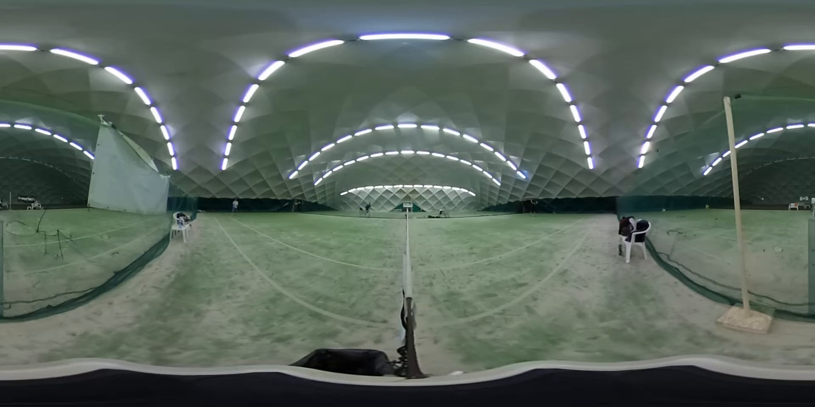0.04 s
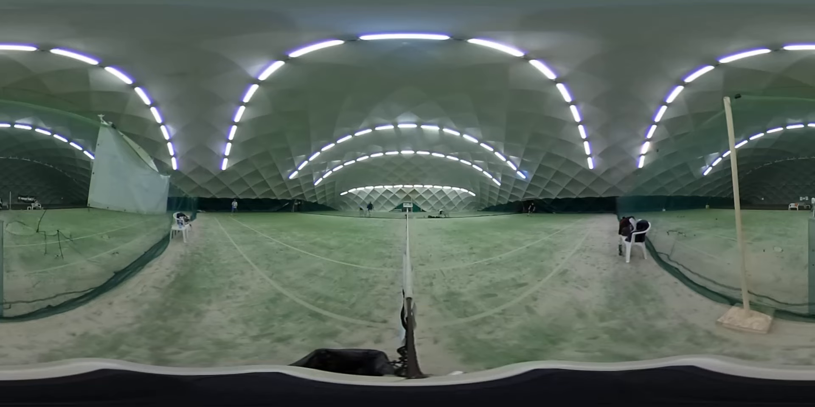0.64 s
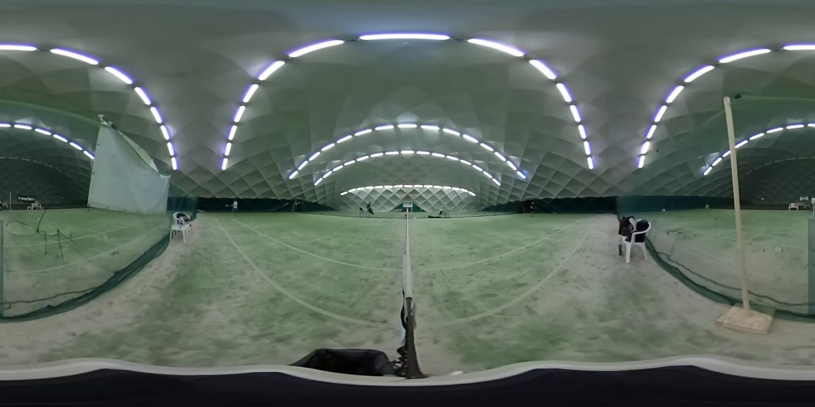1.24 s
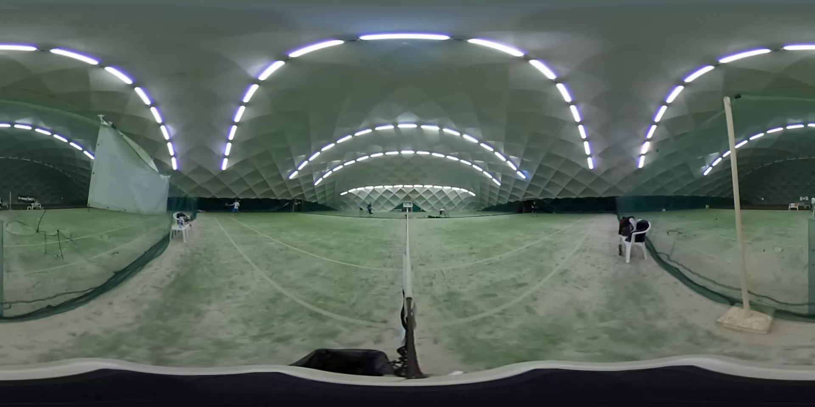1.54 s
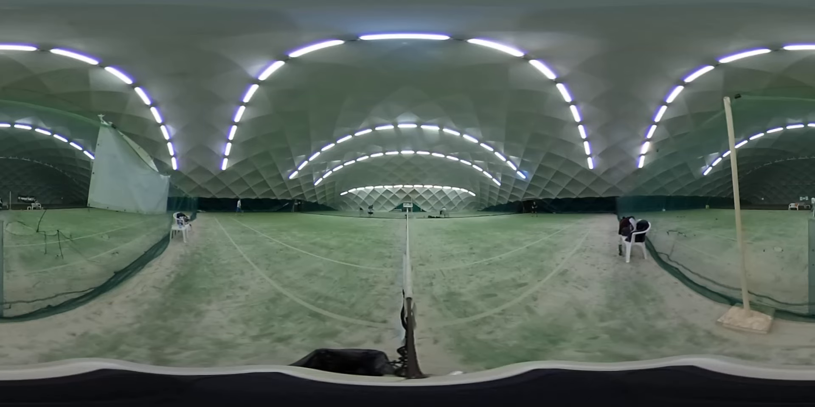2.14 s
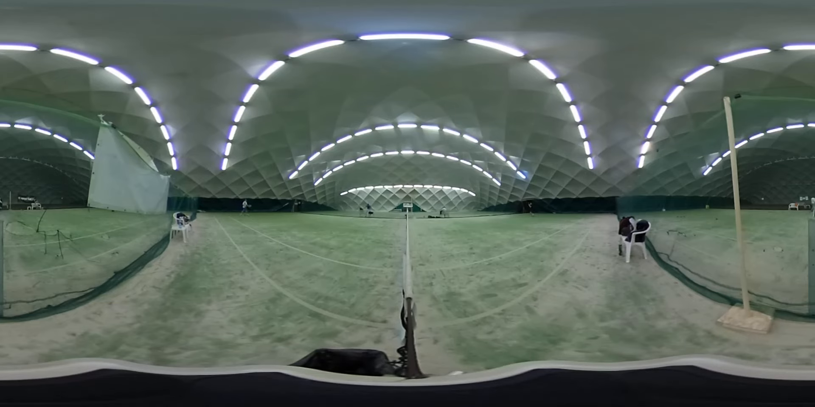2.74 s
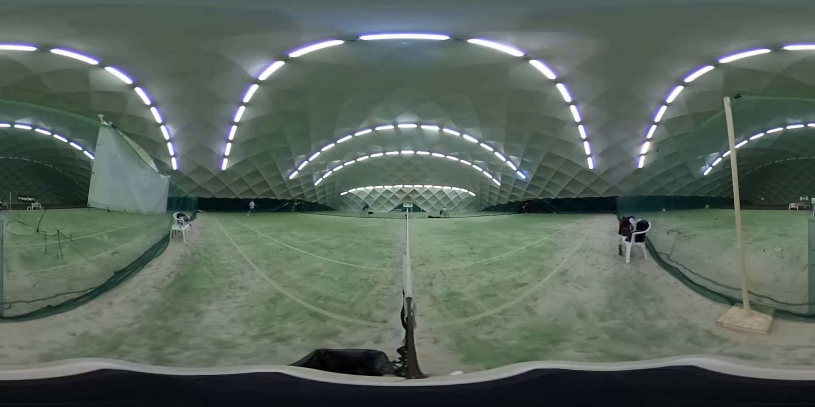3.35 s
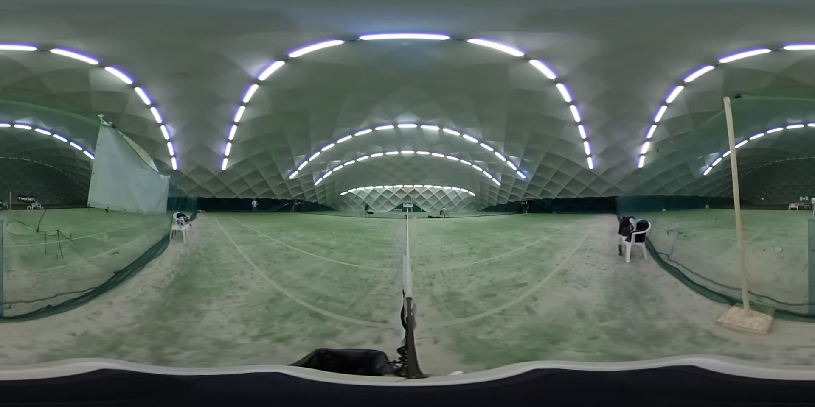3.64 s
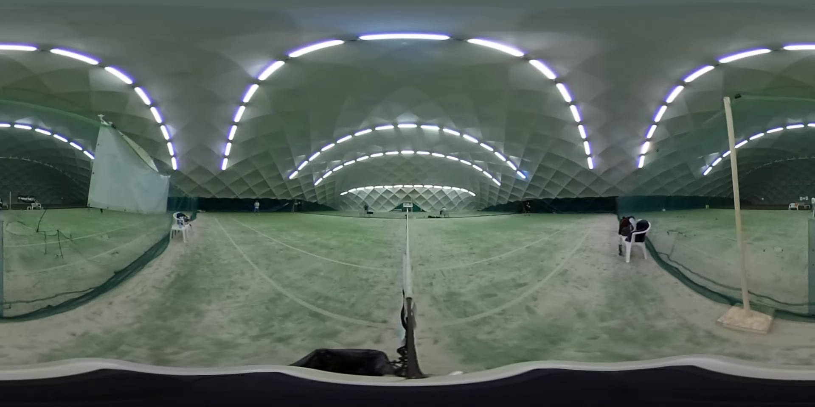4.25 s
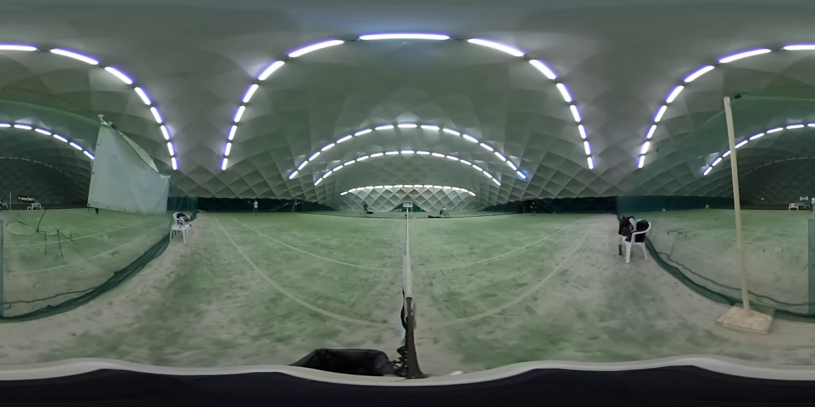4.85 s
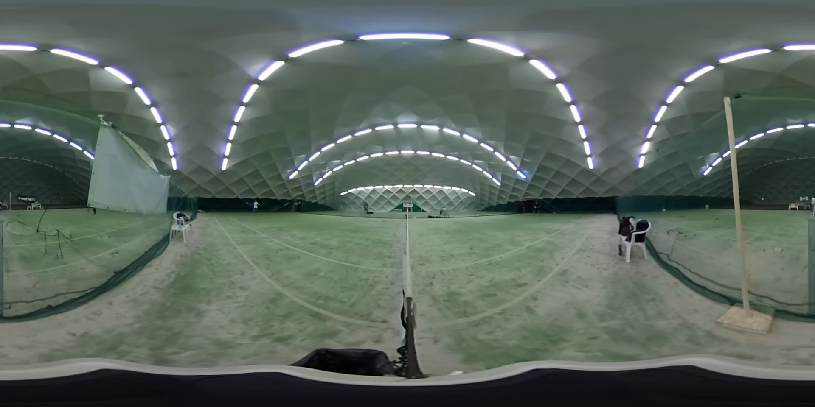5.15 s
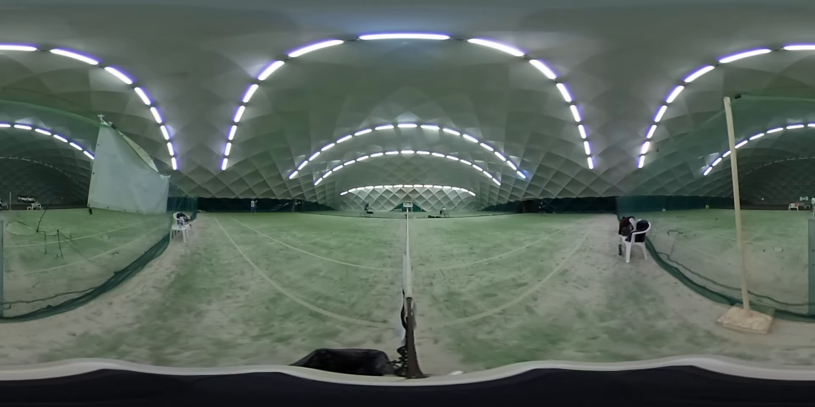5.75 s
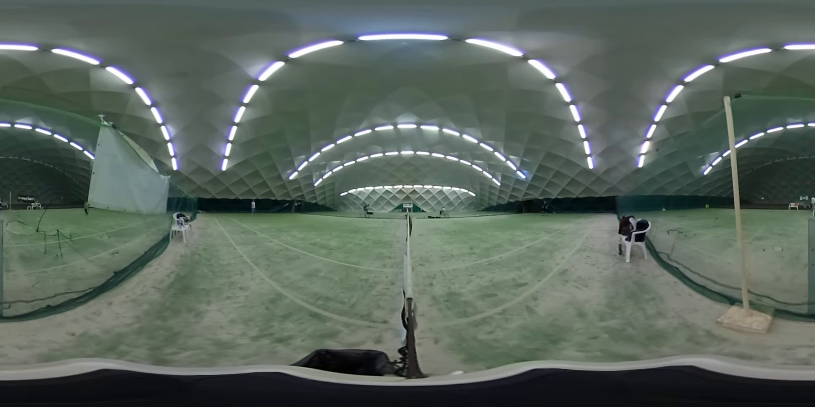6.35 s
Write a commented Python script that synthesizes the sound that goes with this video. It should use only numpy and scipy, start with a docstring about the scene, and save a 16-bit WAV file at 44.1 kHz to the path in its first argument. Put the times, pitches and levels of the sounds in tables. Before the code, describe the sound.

In a domed indoor tennis hall, ventilation hums steadily while rackets strike a ball four times, about two seconds apart, each hollow pop followed by a long echo. Dull distant bounces, faint steps and shoe squeaks come in between. At the end the ball hits the net right beside the microphone, rattling the band at the post and sending short falling chirps along the steel cable.

```python
"""Tennis in a domed indoor hall, the microphone at the net post. Ventilation hums and faint steps carry
over from the other courts. Four racket strokes follow, each thrown back by the roof and then, late and
long, by the far end; between them come distant bounces and shoe squeaks, and the dome lingers and booms.
Last, close by, the ball hits the net: the band rattles at the post and a kink runs to and fro along the
steel cable in falling chirps."""
import sys
import numpy as np
from scipy import signal
from scipy.fft import rfft, irfft, next_fast_len
from scipy.io import wavfile
from scipy.ndimage import uniform_filter1d, map_coordinates

SR = 44100
rng = np.random.default_rng(int(sys.argv[2]) if len(sys.argv) > 2 else 0)


def transcribe(signal):
    """Save signal, clipped to [-1, 1], as a 16-bit WAV file at the path in sys.argv[1]."""
    frames = np.atleast_2d(signal).T
    limited = np.clip(frames, -1, 1)
    pcm = np.round(limited * 32767).astype(np.int16)
    wavfile.write(sys.argv[1], SR, pcm)


N = 290619

# racket strokes: (t/s, level/dB, strings f/Hz, strings/dB, crack/dB, frame/dB, first roof delay/s,
# second roof delay/s, first echo's share of the roof energy, end wall delay/s, end wall/dB)
STROKES = [(0.459, -27, 620, -2.5, -12, -24.5, .0132, .0275, 0.26, .111, -11),
           (1.8156, -27.5, 983, -6, -14.5, -33, 0.018, 0.025, 0.26, 0.12, -7.5),
           (3.6847, -29, 875, 0.5, -12.5, -15.5, .0142, .0225, 0.8, .107, -3),
           (5.6166, -27.5, 1050, -6.5, -16.5, -42, .0178, .023, 0.18, 0.13, -2.5)]
# the net rattling at its post: (t/s, relative level/dB, decay/s, low knock/dB, rasp/dB)
RATTLES = [(6.192, -29, 0.01, 2.5, -35), (6.1975, -27.5, .0047, 5, -14), (6.205, -32, 0.021, 5, -42),
           (6.217, -24.5, .0057, -5, -38), (6.2402, -14, 0.007, -34, -17.5), (6.244, -12, 0.0097, -20, -23),
           (6.2565, -10.5, 0.0047, -15, -31), (6.263, -32, .021, 3, -22), (6.295, -36, 0.014, 0, -16.5),
           (6.3425, -33.5, .003, 5, -20), (6.415, -37.5, 0.007, -12, -17), (6.42, -35.5, .0054, -3, -23),
           (6.4309, -31.5, .0056, 2, -45), (6.4447, -20, 0.0029, -11, -21.5),
           (6.451, -33.5, 0.0068, -1.5, -45)]


def amp(db):
    """Decibels to gain."""
    return 10 ** (np.asarray(db) / 20)


def unit(x):
    """x at rms 1."""
    return x / np.sqrt(np.mean(x ** 2) + 1e-20)


def along(points, hz):
    """(f/Hz, value) points read on a log frequency axis."""
    f, v = np.transpose(points)
    return np.interp(np.log(hz + 1), np.log(f + 1), v)


def filtered(x, response):
    """x shaped by a gain that depends on frequency."""
    size = next_fast_len(len(x) + 8192)
    return irfft(rfft(x, size) * response(np.fft.rfftfreq(size, 1 / SR)), size)[:len(x)]


def noise(spectrum, size):
    """Noise of rms 1 with a spectrum of (f/Hz, level/dB) points."""
    return unit(filtered(rng.standard_normal(size), lambda hz: amp(along(spectrum, hz))))


def ringing(modes, size):
    """Noise of rms 1 ringing in steep-sided resonances: (f/Hz, width/Hz, level/dB)."""
    def gain(f):
        return sum(amp(db) * (f * width) ** 2 / ((hz * hz - f * f) ** 2 + (f * width) ** 2)
                   for hz, width, db in modes)
    return unit(filtered(rng.standard_normal(size), gain))


def even(x, size=220):
    """Noise held at rms 1 over every few milliseconds, so that a blow has a definite strength."""
    return x / np.sqrt(np.abs(uniform_filter1d(x ** 2, size)) + 1e-9)


def swell(t, peak):
    """A bump that rises to 1 at time peak and dies away."""
    u = np.maximum(t, 0) / peak
    return u * np.exp(1 - u)


def add(track, s, sound):
    """Mix a sound into the track from time s."""
    part = track[max(round(s * SR), 0):][:len(sound)]
    part += sound[:len(part)]


def ventilation():
    """The room tone: steady moving air with two rough fan tones."""
    air = [(12, -59), (20, -11.5), (65, 1), (102, -4), (141, -4), (175, -6.5), (268, -9.5), (299, -7.5),
           (401, -17), (471, -16), (996, -21.5), (1140, -21), (2160, -29.5), (3320, -38), (12000, -41),
           (15600, -62), (22000, -120)]  # spectrum of the airflow: (f/Hz, level/dB)
    fan_tones = [(73, 42, -64), (133.3, 19, -58.5)]  # hum of the fans: (f/Hz, width/Hz, level/dB)
    fans = sum(amp(db) * ringing([(hz, width, 0)], N) for hz, width, db in fan_tones)
    return amp(-52.5) * noise(air, N) + fans


def footwork(count=70, step_db=-64):
    """Faint scrapes and steps from the other courts, at random moments and blurred by the hall."""
    sole = [(200, -5), (600, 3.5), (2300, 3), (3300, -9), (12000, -23)]  # (f/Hz, level/dB)
    out, t = np.zeros(N), np.arange(SR // 10) / SR
    for when, softness, drag in rng.random((count, 3)):
        scrape = swell(t, 0.0011 + 0.012 * drag) * noise(sole, len(t))
        add(out, when * N / SR, amp(step_db - 3.8 * softness) * scrape)
    return out + amp(-7) * hall(out)[:N]


def hall(x, delay=0.108, wall_db=-12, clump_s=0.011, scatter_db=-9):
    """The dome's echo: weak scatter, then the far end answers in a clump and the hall rings on."""
    t60 = [(150, 0.79), (450, 3.03), (700, 3.63), (1000, 1.94), (2500, 1.4), (6000, 1.6), (12000, .5)]  # reverberation time: (f/Hz, T60/s)
    colour = [(100, -15), (280, -3), (450, 2), (700, -3.5), (950, 1), (1200, -1.5), (1600, -2.5),
              (2400, -0.5), (3600, -9.5), (8000, -1.5), (12000, -12)]  # tone of the hall's echo: (f/Hz, level/dB)
    hz, times, bands = signal.stft(rng.standard_normal(2 * SR), SR, nperseg=256)
    decay = amp(-60 * times / along(t60, hz)[:, None])
    tail = signal.istft(bands * decay, SR, nperseg=256)[1]
    t = np.arange(len(tail)) / SR
    scatter = amp(scatter_db) * np.minimum(t / 0.039, 1)
    clump = 1 + np.exp(-np.abs(t - delay) / clump_s)
    response = amp(-33.5) * tail * np.where(t < delay, scatter, clump)
    add(response, delay, amp([wall_db]))  # the end wall's own sharp echo
    return signal.fftconvolve(x, filtered(response, lambda f: amp(along(colour, f))))


def racket(string_hz, string_db, crack_db, frame_db, thump_hz=275.4, frame_hz=3404, dwell_s=0.00382):
    """The ball squashes with a thump, pop and crack; the frame clicks; the strings ping as it leaves."""
    pop_spectrum = [(200, -19), (480, 15.5), (720, 8), (1000, 7.5), (1350, -6), (1700, -14), (3000, -45),
                    (6000, -60)]  # the ball's hollow pop: (f/Hz, level/dB)
    crack_spectrum = [(400, -1.5), (1200, 16), (1750, 3.5), (2350, 5), (3100, -6.5), (4400, -6),
                      (6300, -12), (8500, -9.5), (12000, -9.5)]  # the crack of contact: (f/Hz, level/dB)
    t = np.arange(SR // 10) / SR
    t_squash, t_free = t - 0.00059, t - dwell_s
    thump = swell(t_squash, 0.002) ** 2 * np.sin(2 * np.pi * thump_hz * t_squash)
    ping = amp(string_db) * swell(t_free, 0.00086) * np.sin(2 * np.pi * string_hz * t_free)
    pop = amp(-11.5) * swell(t_squash, 0.0029) * even(noise(pop_spectrum, len(t)))
    crack_envelope = (1 - np.exp(-t / 0.00051)) * np.exp(-t / 0.0076)
    crack = amp(crack_db) * crack_envelope * even(noise(crack_spectrum, len(t)))
    frame = amp(frame_db) * swell(t, 0.00082) * np.sin(2 * np.pi * frame_hz * t)
    return thump + ping + pop + crack + frame


def roof(x, scatter_s=0.018, scatter_db=-31):
    """A patch of the curved roof throws back one distinct copy with a trail of scatter."""
    colour = [(150, 1), (500, 5), (3000, 6), (7000, 9), (12000, -10)]  # (f/Hz, level/dB)
    t = np.arange(SR // 5) / SR
    response = amp(scatter_db) * np.exp(-t / scatter_s) * noise(colour, len(t))
    response[0] += 1
    return signal.fftconvolve(x, response)


def rally(roof_db=0.5, hall_db=-1.85, roof_to_hall_db=-7):
    """Each stroke reaches the microphone directly, twice off the roof and late from the far end."""
    out = np.zeros(N)
    for s, db, *timbre, first_delay, second_delay, share, wall_delay, wall_db in STROKES:
        blow = lambda: amp(db) * racket(*timbre)  # slightly different in every direction
        add(out, s, blow())
        add(out, s, amp(hall_db) * hall(blow(), wall_delay, wall_db))
        for delay, energy in [(first_delay, share), (second_delay, 1 - share)]:
            add(out, s + delay, amp(roof_db) * np.sqrt(energy) * roof(blow()))
            add(out, s + delay, amp(roof_to_hall_db) * hall(blow(), wall_delay))
    return out


def dome_wash(rally_db=-61, build_s=1, waver_db=1.5, waver_points=14, net_db=-53):
    """The dome's lingering wash builds after the first stroke, wavers and swells when the net is hit."""
    colour = [(100, -8), (280, -6.5), (500, 2.5), (1100, -1.5), (1600, -14), (2300, -15.5), (3500, -28.5),
              (9000, -70)]  # spectrum of the wash: (f/Hz, level/dB)
    t = np.arange(N) / SR
    build = 1 - np.exp(-np.maximum(t - STROKES[0][0], 0) / build_s)
    waver = map_coordinates(rng.standard_normal(waver_points), [np.linspace(0, waver_points - 1, N)])
    from_rally = amp(rally_db + waver_db * waver) * np.sqrt(build)
    from_net = amp(net_db) * swell(t - RATTLES[0][0], 0.27)
    return np.hypot(from_rally, from_net) * noise(colour, N)


def far_courts(grit_db=-12, scuff_db=-61, hall_db=-4):
    """Dull bounces, shoe squeaks and scuffs, far from the microphone and half lost in the hall."""
    bounces = [(1.196, -34.5, 282), (1.2288, -40.5, 387), (1.2761, -46.5, 660), (1.391, -47, 353),
               (2.418, -50, 242.2), (3.2356, -43.5, 250), (3.271, -40.5, 295), (4.818, -38.5, 294),
               (4.851, -43.5, 322)]  # balls and footfalls: (t/s, level/dB, f/Hz)
    grit = [(200, -38), (600, 5), (1500, 5), (2500, -55), (4000, -31), (12000, -25)]  # sand under each bounce: (f/Hz, level/dB)
    squeaks = [(1.309, -49.5, 2240, 0.0028), (1.33, -64, 2370, 0.0052), (1.381, -64, 2440, 0.0083),
               (1.438, -59, 1960, 0.0038), (4.667, -60.5, 1910, 0.023)]  # shoe squeaks: (t/s, level/dB, f/Hz, rise/s)
    scuffs = [2.106, 2.338, 2.42, 2.537, 2.626, 2.74, 2.973]  # shoes scuffing the sanded court: (t/s)
    sand = [(400, 8), (1500, 16), (2500, 13), (4000, -1), (8000, 0.5), (12000, 0)]  # sand under a scuffing shoe: (f/Hz, level/dB)
    out, t = np.zeros(N), np.arange(SR // 10) / SR
    for s, db, hz in bounces:
        thud = np.sin(2 * np.pi * hz * t) + amp(grit_db) * noise(grit, len(t))
        add(out, s, amp(db) * swell(t, 0.0016) * thud)
    for s, db, hz, rise in squeaks:
        bands = [(hz * 0.86, hz * 0.24, 0), (hz * 1.08, hz * 0.17, -1)]  # either side of the pitch
        add(out, s, amp(db) * swell(t, rise) * even(ringing(bands, len(t))))
    for s in scuffs:
        add(out, s, amp(scuff_db) * swell(t, 0.0054) * noise(sand, len(t)))
    return out + amp(hall_db) * hall(out)[:N]


def dome_booms():
    """Narrow bands of the dome's reverberation that swell and linger."""
    notes = [(1.95, -55, 237, 25, 0.19), (2.0, -56.5, 455, 49.7, 0.23), (5.281, -56.5, 275, 40.7, 0.16),
             (5.73, -52.5, 740, 202, 0.11)]  # notes of the dome: (t/s, level/dB, f/Hz, width/Hz, rise/s)
    out, t = np.zeros(N), np.arange(2 * SR) / SR
    for s, db, hz, width, rise in notes:
        add(out, s, amp(db) * swell(t, rise) * ringing([(hz, width, 0)], len(t)))
    return out


def net(cable_hz=1105, chirp_hz=2080, fall_s=0.00204, spread=0.0035):
    """Close up, the struck net rattles; its cable carries treble fastest, so a kink returns as a chirp."""
    rattle_knock = [(30, 0.5), (120, -7.5), (230, -8), (350, 3.5), (480, -2), (650, 3), (1100, -12),
                    (2200, -34), (5000, -78)]  # a rattle's low knock: (f/Hz, level/dB)
    rattle_rasp = [(800, -30), (2000, 0), (2600, 15), (3200, -0.5), (4300, -4), (5200, 0.5), (6300, 3.5),
                   (7000, -11), (8000, 4), (9500, -25), (10800, -6), (12000, -5.5)]  # its bright rasp: (f/Hz, level/dB)
    post_modes = [(603, 65, -2), (739, 53, 2.5), (940, 120, -3), (1114, 180, 2), (1240, 68, -12),
                  (1544, 200, -4), (1850, 210, -9), (2560, 210, -27)]  # resonances of post and net band: (f/Hz, width/Hz, level/dB)
    returns = [(6.2377, -16.5), (6.328, -19.5), (6.487, -27), (6.568, -32.5)]  # the kink arriving back at the post: (t/s, level/dB)
    out, t = np.zeros(N), np.arange(SR // 6) / SR
    for s, db, decay_s, knock_db, rasp_db in RATTLES:
        post = even(ringing(post_modes, len(t)))
        knock = amp(knock_db) * even(noise(rattle_knock, len(t)))
        rasp = amp(rasp_db) * noise(rattle_rasp, len(t))
        cable = amp(-11) * np.sin(2 * np.pi * (cable_hz * t + rng.random()))
        envelope = (1 - np.exp(-t / 0.00075)) * np.exp(-t / decay_s)
        add(out, s, amp(db + 1) * envelope * (post + knock + rasp + cable))
    falling_hz = chirp_hz / np.sqrt(1 + t / fall_s)
    for s, db in returns:
        rise = 0.0015 + spread * (s - returns[0][0])  # the longer the travel, the longer the chirp
        chirp = swell(t, rise) ** 2.1 * np.sin(2 * np.pi * np.cumsum(falling_hz) / SR)
        shaken_post = amp(-10.5) * swell(t, 0.0019) * even(ringing(post_modes, len(t)))
        add(out, s, amp(db) * (chirp + shaken_post))
    return out + amp(-41) * hall(out)[:N]


def scene():
    """Everything as it reaches the one microphone at the net post."""
    return (rally() + far_courts() + footwork() + dome_booms() + net() + dome_wash() + ventilation())[None]


def record(dry):
    """The camera's microphone channel keeps nothing above its band limit."""
    top_hz = 12150
    return np.array([filtered(channel, lambda hz: hz < top_hz) for channel in dry])


dry = scene()
out = record(dry)
transcribe(out)
```